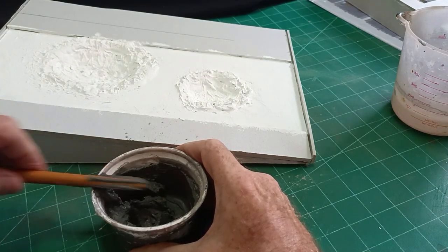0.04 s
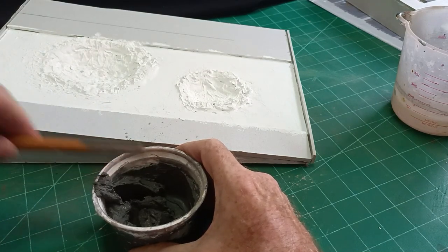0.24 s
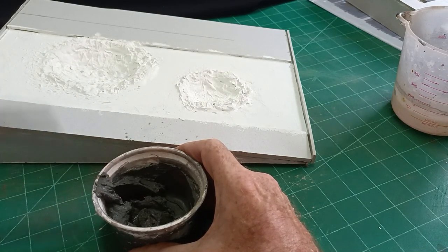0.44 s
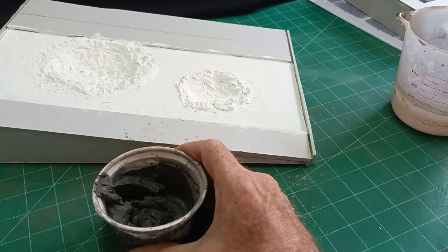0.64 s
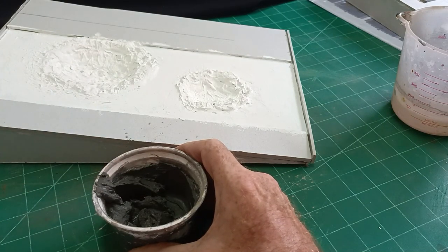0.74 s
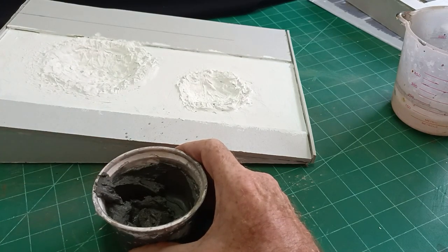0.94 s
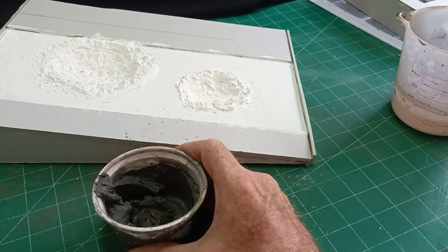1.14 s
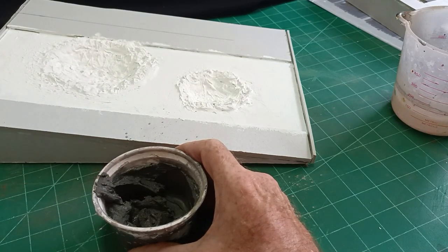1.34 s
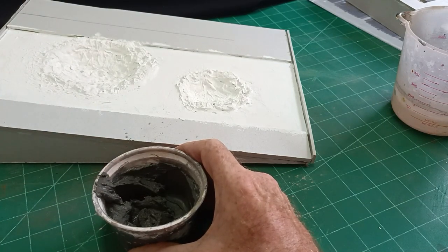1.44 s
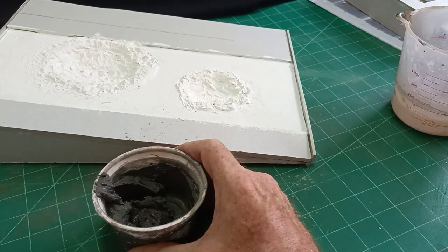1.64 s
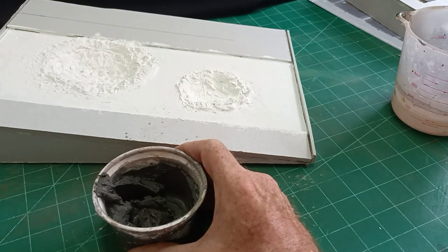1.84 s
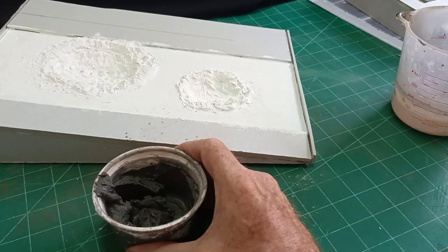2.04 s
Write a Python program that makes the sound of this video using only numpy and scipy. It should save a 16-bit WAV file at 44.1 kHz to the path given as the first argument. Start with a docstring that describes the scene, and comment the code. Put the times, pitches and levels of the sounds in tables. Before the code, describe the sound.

Two sharp knocks of a handle on a small filled pot, with gritty wiping and a late clatter

```python
"""A brush handle wipes gritty grout and is knocked twice on a small pot, close by in a small room.
Knocks ring decaying modes of pot and table; wiping is random grains, shaped as fine grit and lower drag.
Later something light slides and clatters on the table: jolts ring its modes over a hiss. Small ticks and
scuffs are noise bursts. A mains hum (a wavering sine) and soft shaped room noise go on throughout.
The microphone peaks near 10 kHz."""
import sys
import numpy as np
from scipy import signal
from scipy.fft import rfft, irfft
from scipy.io import wavfile
from scipy.ndimage import uniform_filter1d

SR = 44100
rng = np.random.default_rng(int(sys.argv[2]) if len(sys.argv) > 2 else 0)


def persist_wave(psi):
    """Save psi, clipped to +-1, as 16-bit WAV."""
    counts = np.round(np.clip(psi, -1, 1) * 32767).astype(np.int16)
    wavfile.write(sys.argv[1], SR, np.atleast_2d(counts).T)


def magnitude_from_level(level_db):
    """Linear magnitude for a level in decibels (20 dB per decade)."""
    exponent = np.asarray(level_db, float) / 20
    return 10 ** exponent


N = 92610  # 2.1 s


def unit(x):
    """Scale to rms 1."""
    return x / np.sqrt(np.mean(x ** 2))


def conv(x, h):
    """Convolution cut to the scene's length."""
    return signal.fftconvolve(x, h)[:N]


def add(out, s, x):
    """Mix x in at time s (seconds)."""
    i = int(s * SR)
    out[i:i + len(x)] += x[:N - i]


def decay(t, t60):
    """Exponential fade that loses 60 dB in t60 seconds."""
    return 1000. ** (-t / t60)


def colour(x, table):
    """Shape the spectrum by (f/Hz, level/dB) points on a log frequency axis; rms 1."""
    f = np.arange(N // 2 + 1) * SR / N + 1  # +1 Hz keeps the log finite
    hz, db = np.array(table).T
    gain = magnitude_from_level(np.interp(np.log(f), np.log(hz), db))
    return unit(irfft(rfft(x) * gain, N))


def curve(rows, col):
    """Gain from the dB in one column against time, silent outside the table."""
    r = np.array(rows)
    return magnitude_from_level(np.interp(np.arange(N) / SR, r[:, 0], r[:, col], left=-200, right=-200))


def grains(per_s, spread_db):
    """Random clicks of uneven size, per_s of them a second on average; rms 1."""
    hit = rng.random(N) < per_s / SR
    boost_db = spread_db * rng.exponential(size=N)
    return unit(hit * rng.standard_normal(N) * magnitude_from_level(boost_db))


def walk(rate):
    """Random wander of rms 1: noise averaged twice over 1/rate seconds."""
    k = int(SR / rate)
    return unit(uniform_filter1d(uniform_filter1d(rng.standard_normal(N), k), k))


def ring(modes, size):
    """Sum of decaying sines from (f/Hz, level/dB, t60/s) rows."""
    t = np.arange(size) / SR
    return sum(magnitude_from_level(db) * np.sin(2 * np.pi * hz * t) * decay(t, t60) for hz, db, t60 in modes)


def small(x, hz):
    """A small radiator loses its bass steeply below hz."""
    return signal.sosfilt(signal.butter(3, hz, "high", fs=SR, output="sos"), x)


# Spectrum of the soft room noise [f/Hz, level/dB]
AIR_SPECTRUM = [(20, -22), (40, -11), (64, 2.5), (100, -4), (130, 3.5), (200, 3), (363, -3), (607, -9),
                (900, -5.5), (2000, -14), (3000, -19.5), (4870, -33.5), (9000, -40), (16000, -38.5)]


def air():
    """Soft room noise: shaped random noise whose level drifts slightly."""
    level_db = -59 + 0.26 * walk(2.7)
    return magnitude_from_level(level_db) * colour(rng.standard_normal(N), AIR_SPECTRUM)


def hum():
    """Mains hum: one sine that wavers a little in pitch and level."""
    hz = 99.7 + 0.21 * walk(20)
    level_db = -48.5 + 0.7 * walk(8)  # rms
    return np.sqrt(2) * np.sin(2 * np.pi * np.cumsum(hz) / SR) * magnitude_from_level(level_db)


# Reverberation by octave band, levels relative [f/Hz, level/dB, t60/s]
ROOM_BANDS = [(130.6, -0.5, 0.58), (194, 5, 0.3), (423, 7.5, 0.19), (810, -5, 0.34), (1344, -2, 0.35),
              (1850, -6, 0.34), (4000, -4.5, 0.2), (8000, -26, 0.032)]
# Echoes from near surfaces, relative to the direct sound; the first path is some 0.9 m longer
# [delay/s, level/dB]
NEAR_ECHOES = [(.0025, -11), (.0078, -25), (0.0102, -27), (0.0125, -17), (0.0173, -27), (0.021, -20.5),
               (0.0251, -21), (0.0374, -20), (.052, -21.5)]


def room(x):
    """The direct sound, discrete echoes, and a diffuse tail that swells in and dies away band by band."""
    swell_s, tail_db = 0.0045, -9
    t = np.arange(SR // 2) / SR
    tail = np.zeros(len(t))
    for hz, db, t60 in ROOM_BANDS:
        octave = [hz / np.sqrt(2), hz * np.sqrt(2)]
        band = signal.butter(2, octave, "band", fs=SR, output="sos")
        tail += signal.sosfilt(band, rng.standard_normal(len(t))) * magnitude_from_level(db) * decay(t, t60)
    tail = tail * np.clip(t / swell_s, 0, 1) ** 3 / np.sqrt(SR * 0.011)
    tail = magnitude_from_level(tail_db) * tail
    for delay_s, db in NEAR_ECHOES:
        add(tail, delay_s, magnitude_from_level([db]))
    return x + conv(x, tail)


# Small ticks and scuffs, level of the noise before its envelope [t/s, level/dB, centre f/Hz, t60/s]
TICK_EVENTS = [(0.037, -35.5, 1460, 0.026), (.198, -78, 9500, 0.016), (.355, -30.5, 1410, .04),
               (.64, -41.5, 5040, 0.011), (0.908, -64.5, 8300, 0.024), (1.055, -70, 9100, 0.013),
               (1.63, -49, 1000, 0.12), (1.8121, -28.5, 4000, 0.021), (1.849, -50, 8000, .012),
               (1.8958, -34, 9700, 0.0027), (1.936, -36.5, 2130, 0.011), (2.054, -62, 10700, 0.036),
               (2.054, -46, 1080, 0.17)]


def ticks():
    """Brief bursts of noise, each under an octave wide, with a quick rise and an exponential fade."""
    out, t = np.zeros(N), np.arange(5000) / SR
    for s, db, hz, t60 in TICK_EVENTS:
        band = signal.butter(2, [hz / 1.3, hz * 1.3], "band", fs=SR, output="sos")
        noise = unit(signal.sosfilt(band, rng.standard_normal(6000)))[1000:]  # skip the filter's start
        rise = np.clip(30 * t / t60, 0, 1)
        add(out, s, magnitude_from_level(db) * noise * rise * decay(t, t60))
    return out


# Course of the slide of the light object [t/s, low rumble/dB, ringing/dB, hiss/dB]
SLIDE_COURSE = [(1.755, -58, -95, -88), (1.777, -46, -51.5, -48), (1.785, -48, -32.5, -38),
                (1.80, -32.5, -37, -49.5), (1.81, -28, -45, -49), (1.82, -35, -31.5, -38.5),
                (1.84, -35, -37.5, -42.5), (1.87, -55, -48, -56), (1.9, -48, -53.5, -54),
                (1.92, -56.5, -72, -54.5), (1.94, -52.5, -76, -53), (1.97, -61, -76, -57.5),
                (2.035, -63, -66, -65.5), (2.046, -48.5, -45.5, -84), (2.07, -54, -62.5, -73),
                (2.1, -54, -67, -73)]
# Hard jolts of the sliding object [t/s, into low modes/dB, into high modes/dB]
HARD_JOLTS = [(1.779, -40, -31), (1.7843, -30, -15), (1.7945, -28, -10), (1.8118, -19.5, -9.5),
              (1.817, -4, -21), (1.82, -7.5, -9), (1.834, -20, -27), (1.8378, -23, -16.5),
              (2.041, -32, -47)]
# Low modes of the object, levels relative [f/Hz, level/dB, t60/s]
OBJECT_LOW_MODES = [(175, -13, 0.03), (256, -6, 0.03), (328, 1, 0.04), (440, -8, .02), (565, 0, 0.035),
                    (616, 4, 0.05), (836, -5.5, 0.041)]
# High modes of the object, levels relative [f/Hz, level/dB, t60/s]
OBJECT_HIGH_MODES = [(1000, -0.5, 0.041), (1332, -3.5, 0.058), (1592, 0, 0.07), (1933, -0.5, 0.019),
                     (2310, -1, 0.025), (2658, -1, 0.03), (3026, 0.5, 0.026), (3350, -32, 0.016),
                     (4060, -7.5, 0.019), (4560, -5.5, 0.022), (4880, -19, 0.05), (5670, -28, 0.031),
                     (6860, -19, 0.038)]
# Spectrum of the hiss along the table [f/Hz, level/dB]
HISS_SPECTRUM = [(1000, -2.5), (2500, -0.5), (3800, -11), (5000, -5), (8000, -13.5), (11500, -10.5),
                 (13500, -6.5), (16000, -14.5)]


def slide():
    """Stick-slip jolts ring the light object's modes and hiss along the table."""
    jolts = grains(2600, 1.0)
    hiss = colour(0.24 * jolts + rng.standard_normal(N), HISS_SPECTRUM)
    out = hiss * magnitude_from_level(2.8 * walk(110)) * curve(SLIDE_COURSE, 3)
    for col, modes in [(1, OBJECT_LOW_MODES), (2, OBJECT_HIGH_MODES)]:
        body = small(ring(modes, 9000), 86)
        body = body / np.sqrt(np.sum(body ** 2))
        drive = jolts * curve(SLIDE_COURSE, col)
        for jolt in HARD_JOLTS:
            add(drive, jolt[0], magnitude_from_level([jolt[col]]))
        out = out + conv(drive, body)
    return out


# Soft bumps in the low ring of the pot, level at the end of the rise
# [t/s, level/dB, f/Hz, rise/s, t60/s]
SOFT_BUMPS = [(.002, -48, 260, .01, .12), (.025, -53, 180, .04, .3), (.045, -47, 312, .025, .09),
              (.18, -54, 520, .02, .1), (2.08, -49, 190, .02, .2)]


def bumps():
    """Soft bumps wake only the low ring of the pot: each swells and fades in one mode."""
    out, t = np.zeros(N), np.arange(9000) / SR
    for s, db, hz, rise_s, t60 in SOFT_BUMPS:
        swell = np.clip(t / rise_s, 0, 1)
        add(out, s, swell * ring([(hz, db, t60)], 9000) / decay(rise_s, t60))
    return out


# Three passes of wiping, levels before flicker [t/s, fine grit/dB, heavier drag/dB]
WIPE_PASSES = [
    [(0, -44, -41.5), (.035, -44.5, -47.5), (.055, -47.5, -54), (.075, -87, -69), (.115, -73, -59),
     (.15, -77, -43.5), (.18, -75.5, -48.5), (.243, -72.5, -49), (.252, -50, -42.5), (.30, -45, -44),
     (.36, -42.5, -44.5), (.39, -50, -43), (.4, -99, -52), (.435, -64, -56.5), (.45, -71, -75)],
    [(.545, -102, -21), (.57, -55, -76), (.6, -50, -38.5), (.64, -49.5, -41.5), (.68, -72.5, -50),
     (.77, -83, -66)],
    [(1.535, -85, -65), (1.552, -49.5, -100), (1.575, -53.5, -61.5), (1.615, -76, -62.5), (1.64, -77, -63),
     (1.7, -102, -77)],
]
# Spectrum of the fine grit [f/Hz, level/dB]
GRIT_SPECTRUM = [(1700, -42), (2150, -4), (2800, -1), (3300, -6.5), (4000, -12), (5000, -15.5),
                 (6200, -12.5), (7500, -12.5), (11000, -9.5), (14900, -18.5), (16000, -10.5)]
# Spectrum of the heavier drag [f/Hz, level/dB]
DRAG_SPECTRUM = [(150, -14.5), (300, -5.5), (566, -6.5), (900, 0), (1350, -5), (1750, 3), (2200, -9.5),
                 (2800, -12), (3200, -6.5), (3600, -27), (4000, -19), (5500, -25.5), (9000, -71)]
# Resonances of the pot wall that the drag wakes, levels relative [f/Hz, level/dB, t60/s]
WALL_MODES = [(914, -15, 0.036), (1400, 7, 0.035), (1654, -8, 0.034), (2776, -5, .06), (3650, -4, 0.017)]


def wiping():
    """Sand grains crackle finely; the paste drags with a lower rasp that wakes the pot wall."""
    grit = colour(grains(9000, 1.2), GRIT_SPECTRUM) * magnitude_from_level(1.2 * walk(40))
    rasp = grains(5000, 0.46)
    wall = magnitude_from_level(-5) * unit(conv(rasp, ring(WALL_MODES, 4000)))
    drag = unit(colour(rasp, DRAG_SPECTRUM) + wall) * magnitude_from_level(2.15 * walk(57))
    return sum(curve(p, 1) * grit + curve(p, 2) * drag for p in WIPE_PASSES)


# Knocks of the handle; the push sets the contact time, the crack is relative [t/s, push/s, crack/dB]
KNOCK_EVENTS = [(0.245, 0.00034, -31.5), (0.5433, 0.00028, -30)]
# Modes of the knocked pot and table, levels relative [f/Hz, level/dB, t60/s]
POT_MODES = [(862, 1.5, 0.011), (1315, -0.5, 0.012), (1666, -6, 0.014), (1950, -7.5, 0.0068),
             (2225, -21, 0.019), (2736, -15, 0.015), (3425, -35, .01)]
# Low ring of the filled pot, slower to build, levels relative [f/Hz, level/dB, t60/s]
BELLY_MODES = [(312, -18, 0.11), (400, -9, 0.035), (485, -7, 0.035), (635, -22, .07)]
# Late, low answer of the table top, relative to the blow's peak [f/Hz, level/dB, t60/s]
TABLE_MODES = [(65.4, -38, 0.22), (128.6, -20, 0.071), (186.4, -26.5, 0.15)]


def knocks():
    """A short push and rebound rings the pot and table; a faint crack rides on the contact."""
    touch_lead_s, touch_db = 0.00074, -8.5  # the tip touches just ahead of the blow
    belly_rise_s, table_rise_s = 0.003, 0.0087
    out, t = np.zeros(N), np.arange(9000) / SR
    pot = ring(POT_MODES, 9000)
    belly = np.clip(t / belly_rise_s, 0, 1) * ring(BELLY_MODES, 9000)
    table = np.clip(t / table_rise_s, 0, 1) * ring(TABLE_MODES, 9000)
    for s, push_s, crack_db in KNOCK_EVENTS:
        push = np.zeros(200)
        for delay_s, db in [(touch_lead_s, 0), (0, touch_db)]:  # main blow, then the earlier touch
            u = (t[:200] - 2 * push_s - delay_s) / (push_s / 2)
            push += magnitude_from_level(db) * (u - .3) * np.exp(-u ** 2)
        blow = small(np.convolve(pot, push)[:9000], 264)
        blow = blow / np.abs(blow).max() - belly
        blow = blow / np.abs(blow).max()
        crack = magnitude_from_level(crack_db) * uniform_filter1d(rng.standard_normal(9000), 4) * np.exp(-t / 0.001)
        add(out, s, magnitude_from_level(-1.5) * (blow + table + crack))
    return out


def scene():
    """The sources sound in the room; the hum and room noise are added without reverberation."""
    sources = ticks() + slide() + bumps() + wiping() + knocks()
    return (room(sources) + hum() + air())[None]


def roll_off(x):
    """The treble ends steeply here."""
    return signal.sosfilt(signal.butter(12, 16250, fs=SR, output="sos"), x)


def record(dry):
    """The microphone port resonates in the treble; the top is cut above 15.9 kHz."""
    port_hz, width_hz, port_db = 9900, 600, 15
    port = signal.lfilter(*signal.iirpeak(port_hz, port_hz / width_hz, fs=SR), dry)
    top_cut = signal.ellip(10, .2, 60, 15900, fs=SR, output="sos")
    mix = signal.sosfilt(top_cut, dry + (magnitude_from_level(port_db) - 1) * port)
    return roll_off(mix)


dry = scene()
out = record(dry)
persist_wave(out)
```